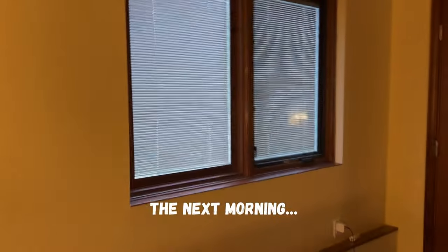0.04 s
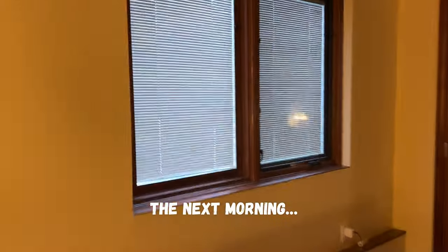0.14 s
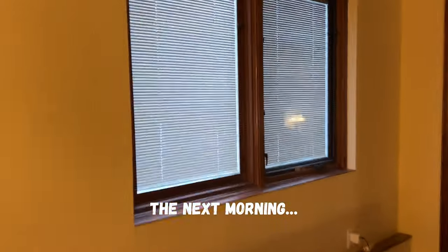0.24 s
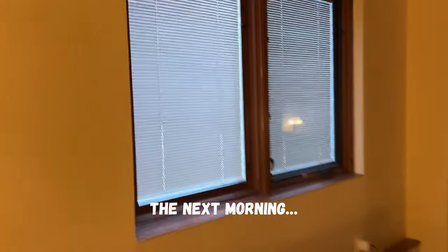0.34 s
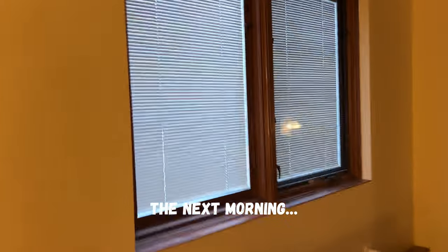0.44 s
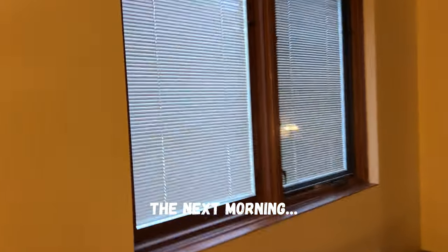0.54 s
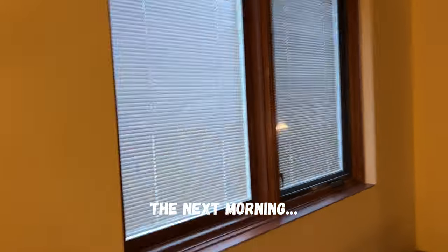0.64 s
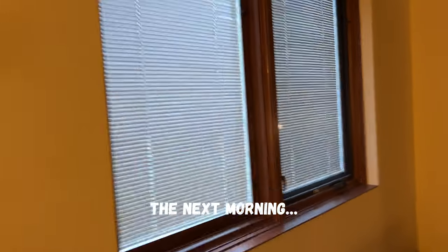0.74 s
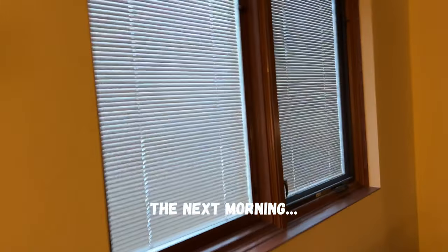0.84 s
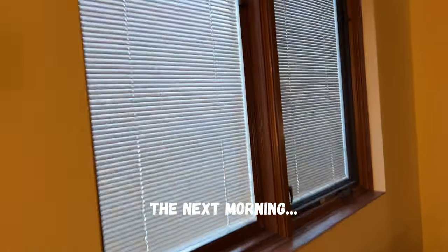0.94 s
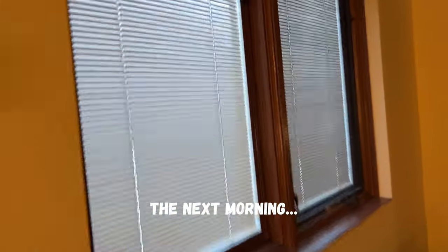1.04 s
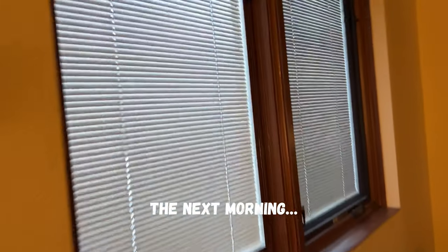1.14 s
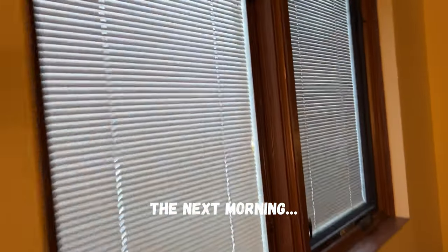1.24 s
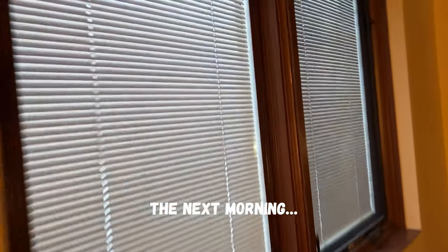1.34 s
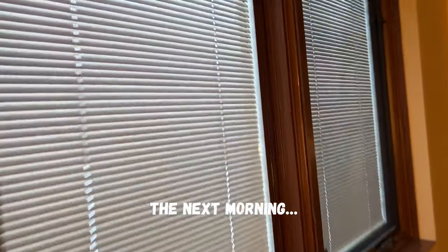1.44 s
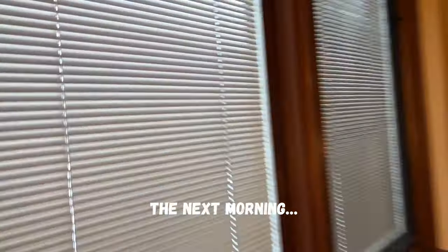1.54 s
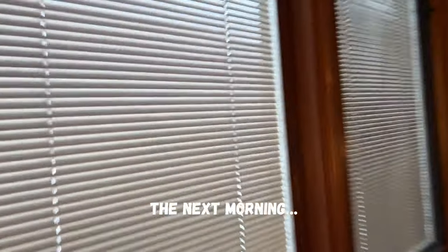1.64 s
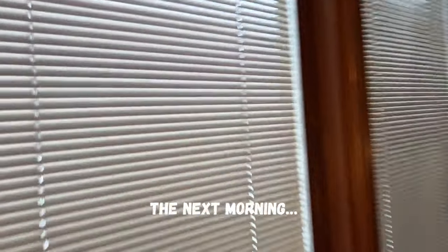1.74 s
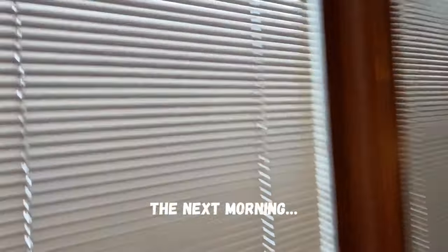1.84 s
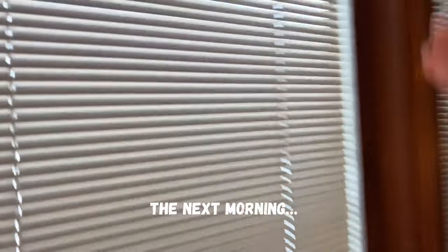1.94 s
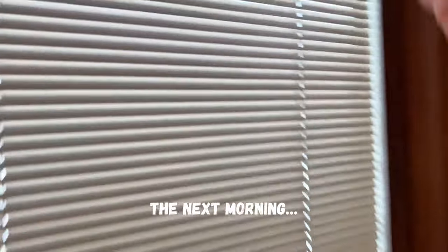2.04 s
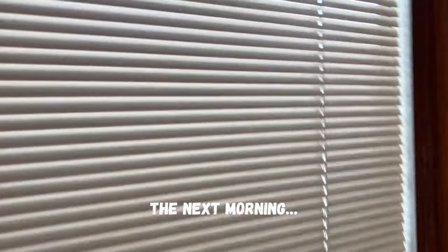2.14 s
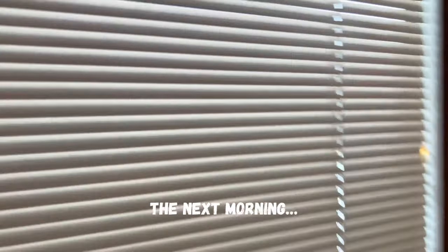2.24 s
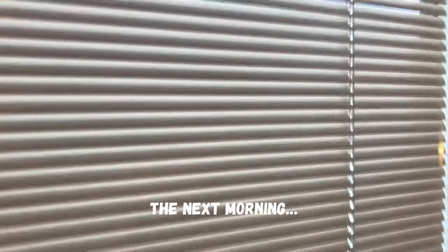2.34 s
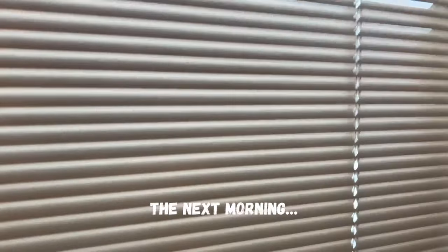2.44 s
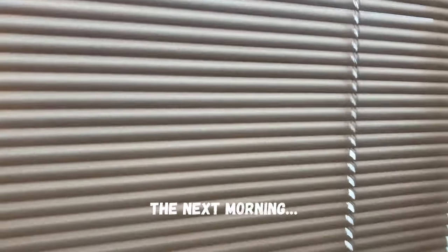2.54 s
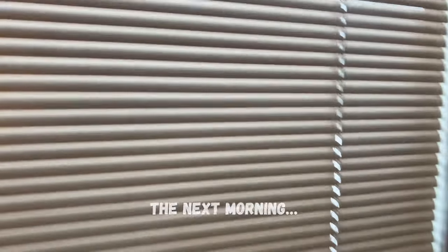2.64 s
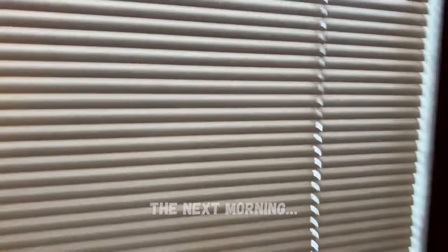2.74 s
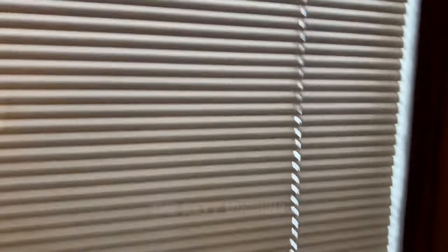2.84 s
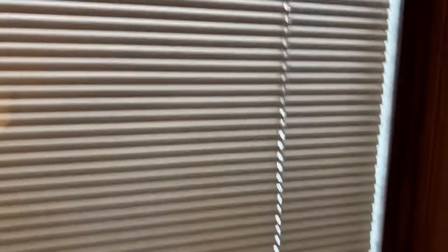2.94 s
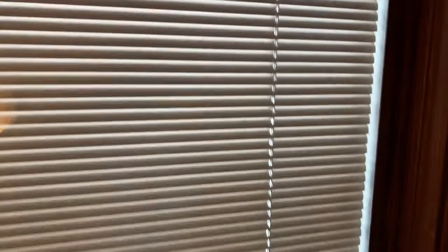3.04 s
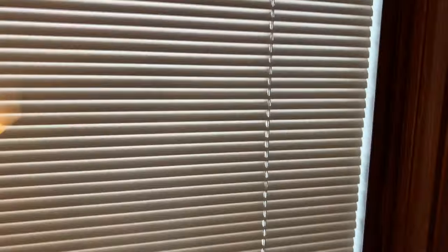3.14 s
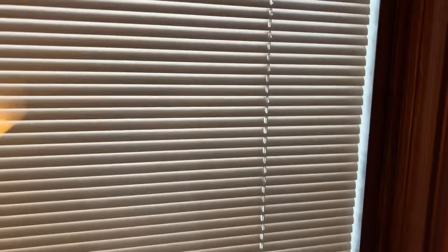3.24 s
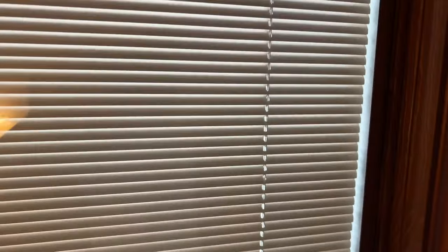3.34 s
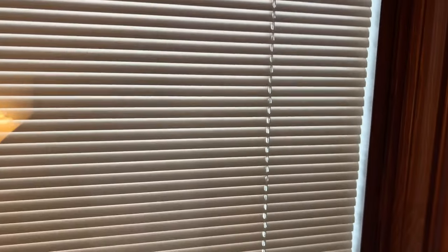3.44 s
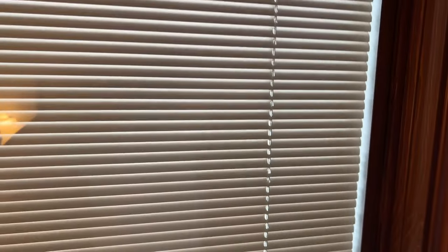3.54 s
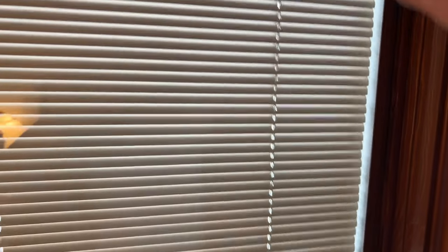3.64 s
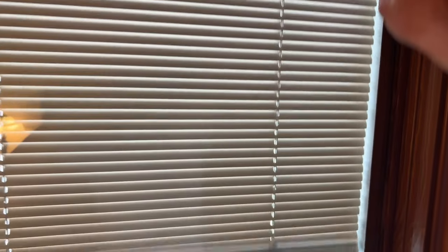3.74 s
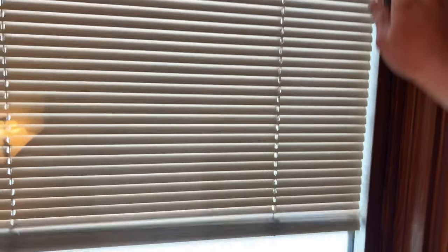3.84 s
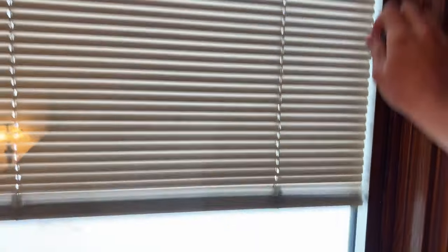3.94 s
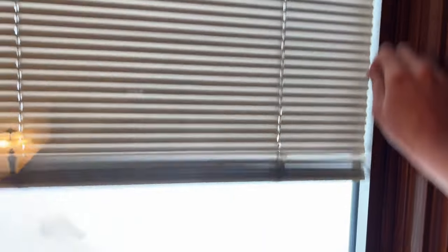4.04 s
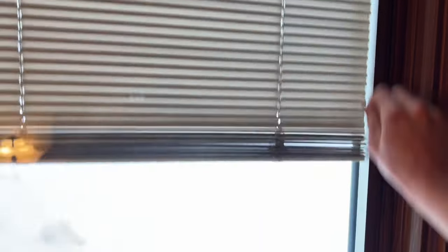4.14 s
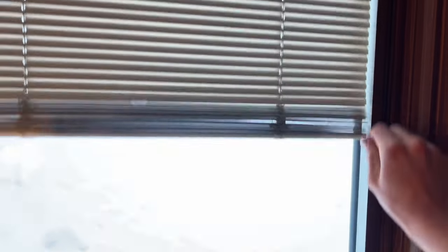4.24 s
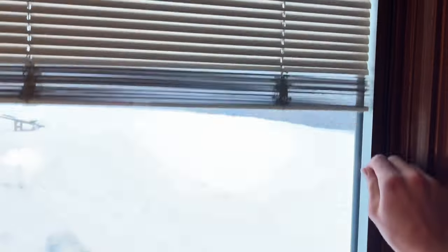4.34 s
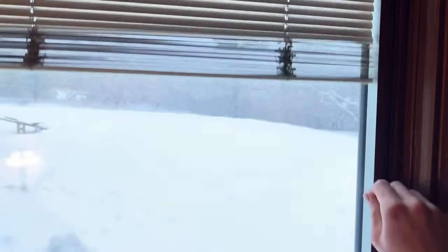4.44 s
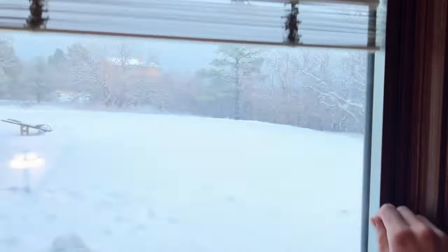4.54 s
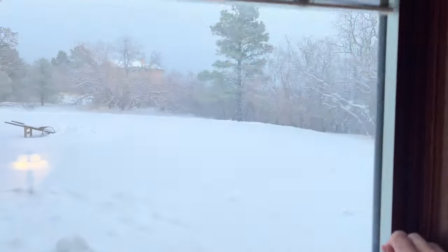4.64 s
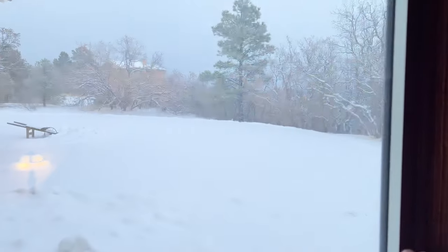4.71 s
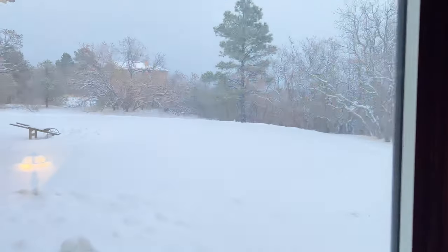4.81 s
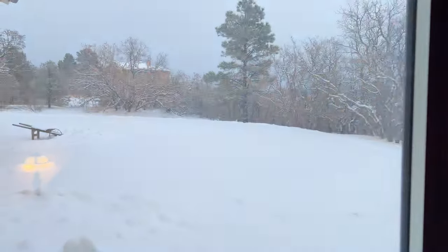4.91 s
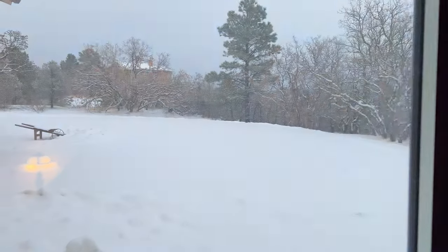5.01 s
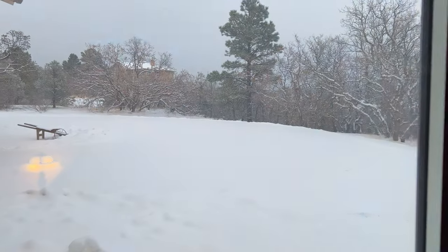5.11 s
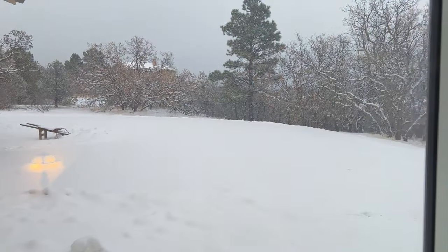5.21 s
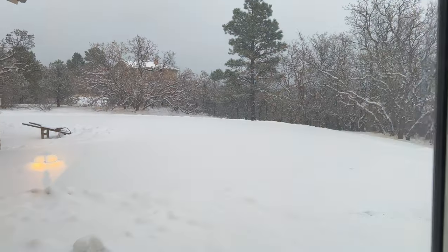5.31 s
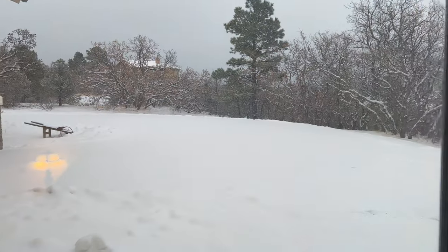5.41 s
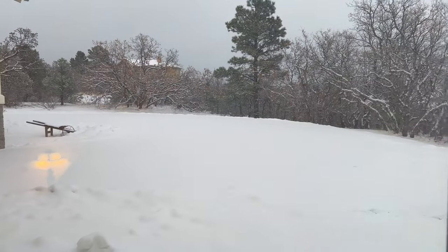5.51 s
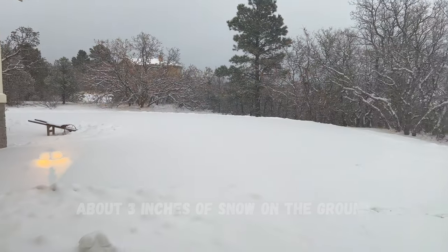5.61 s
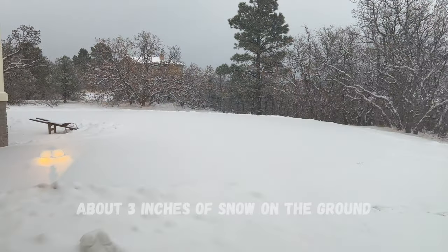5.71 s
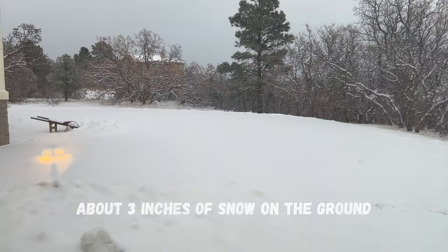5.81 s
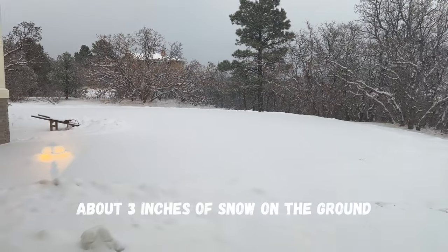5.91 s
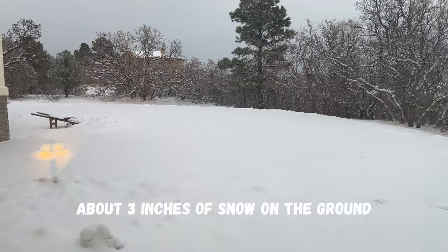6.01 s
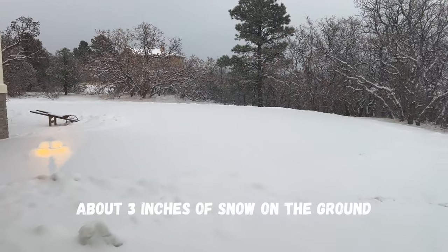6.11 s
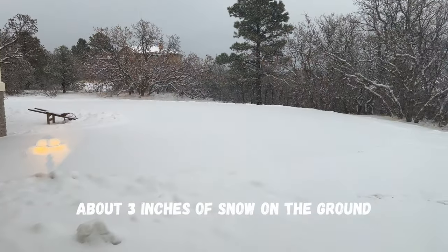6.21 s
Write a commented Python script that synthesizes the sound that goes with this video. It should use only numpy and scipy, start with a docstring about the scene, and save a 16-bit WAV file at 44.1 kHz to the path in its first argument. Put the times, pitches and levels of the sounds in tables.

```python
"""Blind sliding up inside window glazing

Handling rumble, a faint rustle with swishes and a few knocks come first; then a blind is slid up.
Its carriage shakes the panes (filtered noise and an uneven beat), its cord hisses and whistles (filtered
grains and noise), and thin slats chatter and clack as they stack (decaying modes struck repeatedly).
Clacks and knocks also excite a short room tail; a late tock stays dry. Two microphone ports hear the sum."""
import sys
import numpy as np
from scipy import signal
from scipy.fft import rfft, irfft, next_fast_len
from scipy.io import wavfile
from scipy.ndimage import uniform_filter1d

SR = 44100
rng = np.random.default_rng(int(sys.argv[2]) if len(sys.argv) > 2 else 0)


def to_wav(s):
    """Save 16-bit WAV."""
    ch = np.atleast_2d(s).T  # columns
    pcm = np.round(np.clip(ch, -1, 1) * 32767)  # PCM
    wavfile.write(sys.argv[1], SR, pcm.astype(np.int16))


N = 276418

# Modes of one slat. Each row: frequency in Hz, level in dB.
SLAT_MODES = [(620, -3.5), (980, -1), (1220, -3.5), (1440, 2.5), (1580, 0.5), (1780, 1.5), (2100, -2),
              (2450, -6.5), (2900, -14.5), (3500, -14.5)]


def gain_of(db):
    """Amplitude factor of a level in dB."""
    return 10 ** (np.asarray(db) / 20)


def evened(x):
    """Scales to an rms of 1."""
    return x / np.sqrt(np.mean(x ** 2) + 1e-20)


def noise():
    """Two unrelated streams of white noise."""
    return rng.standard_normal((2, N))


def read(points, hz):
    """Interpolates a curve over log frequency."""
    f, value = np.transpose(points)
    return np.interp(np.log(hz + 1), np.log(f + 1), value)


def colour(x, points):
    """Causal minimum-phase filter with the given spectrum in dB."""
    level_db = np.maximum(read(points, np.fft.rfftfreq(8192, 1 / SR)), -100)
    log_gain = np.log(gain_of(level_db))
    circle = np.r_[log_gain, log_gain[-2:0:-1]]
    taps = np.fft.ifft(np.exp(np.conj(signal.hilbert(circle)))).real[:4096]
    return signal.oaconvolve(x, taps[None], axes=1)[:, :N]


def resonate(x, hz, width_hz):
    """Shifts hz down to zero, smooths, and shifts back: a resonance of gain 1."""
    turn = np.exp(2j * np.pi * np.cumsum(hz * np.ones(x.shape[-1])) / SR)
    r = np.exp(-np.pi * width_hz / SR)
    return 2 * (turn * signal.lfilter([1 - r], [1, -r], x / turn + 1e-18)).real


def resonate_twice(x, hz, first_width_hz, second_width_hz):
    """Two resonances in series at one frequency, for steeper skirts."""
    return resonate(resonate(x, hz, first_width_hz), hz, second_width_hz)


def resonance_bank(x, modes):
    """Parallel resonances of alternating sign, evened; rows of Hz, width in Hz, dB."""
    total = 0
    for k, (hz, width_hz, db) in enumerate(modes):
        gain = (-1) ** k * gain_of(db) / np.sqrt(width_hz)
        total = total + gain * resonate_twice(x, hz, 3 * width_hz, width_hz)
    return evened(total)


def columns(table):
    """Each column sample by sample, and a mask that fades in and out around the table."""
    t, rows = np.arange(N) / SR, np.array(table)
    on = (t >= rows[0, 0]) & (t <= rows[-1, 0] + .1)
    return uniform_filter1d(on * 1., 2000), [np.interp(t, rows[:, 0], c) for c in rows.T[1:]]


def grains(per_s, spread_db):
    """Two unrelated streams of tiny clicks, a few of them large."""
    size = gain_of(spread_db * np.minimum(rng.exponential(1, (2, N)), 5))
    return size * np.sign(noise()) * (rng.random((2, N)) < per_s / SR)


def wander(width):
    """Slow random curve of rms 1, smoothed twice over width samples."""
    return evened(uniform_filter1d(uniform_filter1d(rng.standard_normal(N), width), width))


def flutter(width, depth_db):
    """Random gain that wavers over about width samples, by depth_db rms."""
    return gain_of(depth_db * wander(width))


def swell(middle_s, spread_s):
    """A bell of height 1 in time."""
    return np.exp(-.5 * ((np.arange(N) / SR - middle_s) / spread_s) ** 2)


def room(x):
    """Sparse taps of random sign, each band dying at its own speed; two unrelated tails."""
    # Decay of the room. Each row: frequency in Hz, t60 in s.
    room_t60 = [(150, 0.69), (600, 0.22), (2000, 0.37), (6000, 0.24), (14000, 0.21)]
    taps = np.zeros((2, SR // 2))
    at = np.arange(200, SR // 2 - 20, 20)
    places = at + rng.integers(0, 20, (2, len(at)))
    taps[[[0], [1]], places] = rng.choice([-1., 1.], (2, len(at)))
    hz, t, z = signal.stft(taps, SR, nperseg=256)
    fall = gain_of(-60 * t / read(room_t60, hz)[:, None])
    tail = signal.istft(z * fall, SR, nperseg=256)[1]
    return signal.fftconvolve(x[None], tail / np.linalg.norm(tail[0]), axes=1)[:, :N]


def handling():
    """Low handling rumble: filtered noise with a wavering, drawn level."""
    # Handling. Each row: time in s, level in dB.
    handling_levels = [(0.0, -56), (0.3, -65.5), (0.4, -48.5), (0.57, -49), (0.75, -61), (1.01, -53),
                       (1.5, -55), (1.6, -47), (1.8, -44), (2.3, -46.5), (2.4, -41), (2.8, -45.5),
                       (3.0, -41), (3.5, -45.5), (3.85, -54.5), (4.5, -53.5), (5.03, -40), (5.5, -40.5),
                       (5.75, -53.5), (6.27, -46)]
    # Rumble spectrum. Each row: frequency in Hz, relative density in dB per Hz.
    heave_spectrum = [(12, -38), (20, -10), (56, 8), (73, -4), (92, 1), (135, -12), (403, -27),
                      (500, -23.5), (650, -52.5), (1100, -120)]
    _, (heave_db,) = columns(handling_levels)
    return gain_of(heave_db) * evened(colour(noise(), heave_spectrum) * flutter(2500, 2.2))


def rustle():
    """Grainy rubbing whose resonances swell and shift in swishes as the hand moves."""
    # Rustle. Each row: time in s, then relative dB of the main resonance, low mids and treble.
    rustle_levels = [(0.0, -96, -68, -85), (0.18, -89, -89, -100), (0.3, -71, -55, -74.5),
                     (0.65, -78.5, -60, -74), (0.88, -82, -67, -85.5), (0.97, -67, -56, -72),
                     (1.35, -75, -60.5, -78), (1.7, -65, -55, -70.5), (1.88, -64, -47, -62.5),
                     (2.3, -58.5, -51.5, -67.5), (2.47, -62, -65, -75), (2.66, -61, -48, -73),
                     (2.9, -63, -32.5, -80), (5.3, -67, -53, -86), (5.62, -69, -52.5, -91.5),
                     (5.8, -86, -78.5, -77), (6.0, -73, -58.5, -76.5), (6.11, -48.5, -16.5, -56),
                     (6.22, -65, -45.5, -117)]
    # Swishes. Each row: middle in s, spread in s, relative level in dB, main resonance in Hz.
    swish_rows = [(0.05, 0.076, -75, 1840), (0.47, 0.044, -73, 1900), (0.62, 0.04, -73, 1800),
                  (0.81, 0.049, -68.5, 1720), (1.056, 0.016, -62, 1730), (1.19, 0.052, -68, 1670),
                  (1.4, 0.015, -67, 1593), (1.49, 0.023, -63, 1646), (1.69, 0.024, -69.5, 1800),
                  (1.985, 0.034, -55.5, 1960), (2.06, 0.035, -56, 1960), (2.25, 0.015, -59, 1920),
                  (2.55, 0.021, -66, 1970), (2.63, 0.062, -54.5, 1920), (2.858, 0.03, -50.5, 1680),
                  (5.5, 0.031, -60, 1904), (5.6, 0.037, -61.5, 1750), (5.68, 0.04, -60.5, 1600),
                  (5.755, 0.01, -69.5, 1620)]
    # Rustle spectrum. Each row: frequency in Hz, relative density in dB per Hz.
    rustle_spectrum = [(120, -47), (250, -11.5), (700, -10.5), (1400, -3.5), (2400, -7.5), (2900, -14),
                       (3700, -11.5), (5200, -21.5), (7000, -25), (10000, -18.5), (13000, -26.5),
                       (15000, -21.5), (16400, -39)]
    # Upper resonances. Each row: frequency in Hz, width in Hz, relative level in dB.
    upper_modes = [(3690, 380, -7), (5200, 400, -29.5), (6660, 350, -18)]
    calm_hz = 1750
    _, (calm_db, low_db, treble_db) = columns(rustle_levels)
    swells = [gain_of(db) * swell(s, spread_s) for s, spread_s, db, _ in swish_rows]
    level = gain_of(calm_db) + sum(swells)
    weighted_hz = sum(g * row[3] for g, row in zip(swells, swish_rows))
    main_hz = (gain_of(calm_db) * calm_hz + weighted_hz) / level

    rub = evened(grains(600, 2.6)) + 1.9 * noise()
    wide = gain_of(-10.0) * evened(colour(rub, rustle_spectrum))
    low, below = (signal.sosfiltfilt(signal.butter(3, hz, fs=SR, output="sos"), wide)
                  for hz in (1300, 2800))
    main = evened(resonate_twice(rub, main_hz, 540, 480) * flutter(1500, 1.2))
    # upper resonances come out in the stronger, higher swishes
    swish = noise() * (level / gain_of(-44.0)) ** 0.76 * (main_hz / 1900) ** 4
    upper = sum(gain_of(db) / np.sqrt(width_hz / SR) * resonate_twice(swish, hz, width_hz, width_hz)
                for hz, width_hz, db in upper_modes)
    return (gain_of(-1.0) * level * (below - low + main + upper)
            + gain_of(low_db + 2.0) * low + gain_of(treble_db + 20.0) * (wide - below))


def knocks():
    """A snap of a few cycles, a noisy ring around it, a thud that swells more slowly, a treble rattle."""
    # Nearby knocks. Each row: start in s, snap level in dB, pitch in Hz, relative dB of the noisy ring
    # and thud, thud pitch in Hz, relative dB of the treble, t60 in s.
    knock_rows = [(0.067, -57.5, 580, 2.5, -28, 110, 22.5, 0.08),
                  (0.11, -42.5, 370, -4, -31, 250, 26.5, 0.029),
                  (0.112, -46, 674, -16, -30, 110, -20, 0.04), (0.158, -58, 640, -9, -22, 110, -12, 0.043),
                  (0.278, -68.5, 1100, 7, -14, 127, -27, 0.13), (0.39, -62.5, 610, 1, 12.5, 138, -20, 0.17),
                  (0.955, -63, 1700, -2, -17, 110, -6, 0.057), (1.044, -60, 750, 5, -25, 110, -22, 0.14),
                  (1.201, -61, 1710, 6, -6, 154, -5, 0.036), (1.337, -63, 310, 10, -7, 132, -25, 0.085),
                  (1.723, -41, 3650, -25, -8.5, 110, 16, 0.035),
                  (1.781, -22.5, 1500, -18.5, -15, 150, 11, 0.18),
                  (1.782, -26, 4750, -6, -30, 110, -20, 0.019),
                  (1.787, -34.5, 295, -2, -0.5, 117, -20, 0.07),
                  (1.837, -39.5, 1600, -2, -30, 110, -10, 0.034), (2.039, -48, 1030, -4, -1, 111, -16, 0.1),
                  (2.353, -56, 226, 3, 3, 151, -20, 0.04), (2.364, -37.5, 910, 9, 0.5, 135, 22, 0.069),
                  (2.379, -35, 520, 4, -3, 118, -17, 0.091), (2.397, -41, 850, 0, -20, 110, -20, 0.04),
                  (2.416, -46, 1170, -1, -20, 110, -20, 0.077), (2.7, -33, 690, 3, -10, 127, -29, 0.075),
                  (2.702, -30, 1330, -8, -28, 110, -22, 0.03), (2.716, -39, 463, 5, -27, 110, -35, 0.096),
                  (6.018, -45.5, 1070, -6, -4, 112.8, -20, 0.054),
                  (6.098, -32, 403.3, -3.5, 0, 236, -22, 0.15),
                  (6.112, -40, 342.6, -18, 7.5, 167, -33, 0.1)]
    room_send_db = -4
    out, t = np.zeros((2, N + SR)), np.arange(12000) / SR
    for s, db, hz, ring_db, thud_db, thud_hz, treble_db, t60 in knock_rows:
        a, b, c = rng.standard_normal((3, len(t)))
        u = t * hz / 0.97
        snap = np.e * u * np.exp(-u) * np.sin(2 * np.pi * hz * t)
        fall = gain_of(-60 * t / max(t60, .005)) * (1 - np.exp(-t / 0.0013))
        sinking_hz = hz * (.85 + .3 * np.exp(-t / .03))  # the upper modes die first
        ring = evened(resonate_twice(a, sinking_hz, 0.6 * hz, 1.0 * hz)) * gain_of(ring_db) * fall
        thud = np.sin(2 * np.pi * thud_hz * t) + evened(resonate_twice(b, thud_hz, 180, 180))
        thud *= gain_of(thud_db + 8.5 - 60 * t / 0.088) * (1 - np.exp(-t / 0.0075))
        treble = evened(resonate(resonate(c, 1800, 8200), 2800, 17000))
        treble = treble * gain_of(treble_db - 26.0) * fall
        # second row feeds the room: short taps close by stay drier
        far_db = db + room_send_db + 10 * np.log10(t60 / 0.081)
        mix = [[1], [.35]] * snap + ring + [[1], [.45]] * thud + treble
        out[:, round(s * SR):][:, :len(t)] += gain_of([[db], [far_db]]) * mix
    return out[:, :N]


def tock():
    """A late small tock: a few short clear modes."""
    # Tock modes. Each row: frequency in Hz, relative level in dB, t60 in s.
    tock_modes = [(1600, 2, 0.038), (2030, 3.5, 0.027), (2237, -9.5, .02), (2623, -18, .015),
                  (3670, -13, 0.016)]
    start_s, level_db = 5.726, -41.5
    t = np.maximum(np.arange(N) / SR - start_s, 0)
    modes = sum(gain_of(level_db + db - 60 * t / t60) * np.sin(2 * np.pi * hz * t)
                for hz, db, t60 in tock_modes)
    return (1 - np.exp(-t / 0.00061)) * modes


def clacks():
    """Slat modes with a bright tick, a dry crack and a high ping; modes and tick repeat as it settles."""
    # Slats clacking on the stack. Each row: start in s, level in dB, strongest region in Hz,
    # relative dB of the treble tick and of the high ping.
    clack_rows = [(2.86, -40, 1650, -31, -39), (2.958, -39, 1080, -18, -23), (3.071, -31, 1570, -8, -20),
                  (3.158, -24, 2000, -18, -14), (3.285, -12, 1470, -19.5, -27),
                  (3.319, -13, 1500, -16.5, -32), (3.339, -17.5, 1290, -33, -34),
                  (3.451, -11.5, 1220, -15.5, -10), (3.474, -18, 1200, -29, -17), (3.69, -7, 1200, -15, -5),
                  (3.726, -14, 1060, -35, 1.5), (3.83, -33.5, 1500, -30, 20.5),
                  (3.842, -12.5, 1190, -30, -2), (3.915, -19.5, 1400, -25, -12),
                  (3.944, -4.5, 1180, -18, -7), (3.974, -13.5, 1490, -32.5, -26),
                  (4.077, -16.5, 1560, -18, 6), (4.161, -13, 1320, -9.5, 6), (4.323, -27, 1300, -25, 15.5),
                  (4.398, -27.5, 1450, 3, 18), (4.413, -20, 1030, -25, -20), (4.432, -14.5, 1520, -31, 2),
                  (4.559, -21.5, 1250, -14.5, 10.5), (4.598, -22.5, 1850, -4, 15.5),
                  (4.613, -18, 1400, -26.5, -14), (4.645, -10.5, 1340, -21.5, -5),
                  (4.728, -16, 1360, -12, 0), (4.777, -22, 937, -26.5, 11), (4.832, -17.5, 1400, -26, -18),
                  (4.923, -20.5, 1500, -27.5, -2), (5.03, -21, 1390, -24.5, -18),
                  (5.099, -26.5, 1400, -26, -13), (5.212, -23.5, 1377, -28, 4.5),
                  (5.322, -26.5, 2000, -29.5, -25)]
    # A slat settling. Each row: shortest lag in s, random extra lag in s, share of the first blow.
    bounces = [(.0025, .001, 0.72), (.005, 0.00212, 0.44), (.008, 0.0062, 0.22), (0.014, .006, .2),
               (0.021, .008, 0.12)]
    # Tick spectrum. Each row: frequency in Hz, relative density in dB per Hz.
    tick_spectrum = [(1500, -28), (3000, -11.5), (4300, -19.5), (5200, -8.5), (6200, -13.5), (7500, -15.5),
                     (9000, -20), (11000, -9.5), (12500, -22.5), (14300, -12.5), (15500, -15.5),
                     (16400, -23.5)]
    t60_at_1200_hz, crack_db = 0.015, -21.5
    rings, ticks, t = np.zeros(N + SR), np.zeros(N + SR), np.arange(6000) / SR
    for s, db, centre_hz, tick_db, ping_db in clack_rows:
        # high modes die sooner; the place of the blow changes each mode's share
        ring = np.zeros(len(t))
        for hz, mode_db in SLAT_MODES:
            place, tuning = rng.random(2)
            share_db = mode_db + 4 * (place - .5) - 9 * np.log2(hz / centre_hz) ** 2
            mode_hz = hz * (1 + 0.042 * (tuning - .5))
            ring += (gain_of(share_db - 60 * t * hz / (1200 * t60_at_1200_hz))
                     * np.sin(2 * np.pi * (mode_hz * t + 0.62 * place)))
        ring *= 1 - np.exp(-t / 0.0012)
        hit = ring = ring / abs(ring).max()
        burst = single = gain_of(-60 * t / 0.013) * (1 - np.exp(-t / 0.0009))
        for lag_s, spread_s, share in bounces:
            late, strong = rng.random(2)
            pad = np.zeros(round(abs(lag_s + spread_s * late) * SR))
            size = share * (0.61 + 0.5 * strong)
            hit = hit + size * np.sign(late - .5) * np.r_[pad, ring][:len(t)]
            burst = burst + 0.77 * size ** 2 * np.r_[pad, single][:len(t)]
        hit = hit / abs(hit).max()
        ping_hz = 5250 + 400 * rng.random()
        hit += gain_of(ping_db - 15.5 - 60 * t / 0.022) * np.sin(2 * np.pi * ping_hz * t)
        crack = evened(resonate(resonate(rng.standard_normal(len(t)), 2200, 1300), 2700, 2400))
        hit += gain_of(crack_db - 60 * t / 0.033) * crack
        rings[round(s * SR):][:len(t)] += gain_of(db) * hit
        ticks[round(s * SR):][:len(t)] += gain_of(db + tick_db) * burst * rng.standard_normal(len(t))
    return rings[:N] + gain_of(24.0) * colour(ticks[None], tick_spectrum)[0]


def roller(bumps):
    """The roller's beat: a wobbling sine mixed with bumps resonating at the same moving pitch."""
    # Roller. Each row: time in s, beat in Hz, level in dB.
    roller_beat = [(2.9, 181.8, -53), (3.0, 168, -42), (3.28, 163.1, -33), (3.46, 169.9, -30.5),
                   (3.51, 171.8, -21), (3.57, 172, -24.5), (3.62, 230.1, -24.5), (3.7, 254.8, -21.5),
                   (3.78, 245.1, -24), (3.85, 197.1, -27.5), (3.97, 304.1, -19), (4.04, 314.6, -18),
                   (4.17, 245, -22.5), (4.32, 264.9, -21), (4.47, 250.1, -22), (4.61, 275.9, -20),
                   (4.84, 282, -20.5), (4.93, 264.8, -24.5), (5.0, 185.2, -30), (5.08, 175, -27),
                   (5.18, 172, -21), (5.27, 168, -29.5), (5.36, 150, -42), (5.48, 149.2, -41.5),
                   (5.62, 149.8, -52.5), (6.08, 170.6, -72), (6.12, 167.5, -34), (6.18, 162, -36),
                   (6.22, 161, -59)]
    steady_share = 0.48
    rolling, (beat_hz, beat_db) = columns(roller_beat)
    wobble = 0.0499 * wander(600)
    steady = evened(np.sin(2 * np.pi * np.cumsum(beat_hz * (1 + wobble)) / SR))
    uneven = evened(resonate_twice(bumps, beat_hz, 70, 32))
    beat = (steady_share * steady + (1 - steady_share) * uneven) * flutter(500, 1.6)
    return rolling * gain_of(beat_db) * evened(beat)


def pane_rumble(bumps):
    """Small bumps of the carriage ring the panes' resonances."""
    # Pane resonances. Each row: frequency in Hz, width in Hz, relative level in dB.
    pane_modes = [(104, 30, -11), (130.1, 8.4, -4), (168, 8.5, -0.5), (313, 120, -4), (366.7, 51.6, 1),
                  (461.4, 17.3, -9), (607.3, 39, -5), (720, 120, -8.5)]
    return evened(flutter(1500, 1.33) * resonance_bank(bumps, pane_modes))


def slat_chatter():
    """Filtered grains and noise: slats chattering."""
    # Chatter spectrum. Each row: frequency in Hz, relative density in dB per Hz.
    chatter_spectrum = [(180, -18.5), (300, -13.5), (413, -20.5), (602, -13.5), (801, -16), (1170, -13),
                        (1400, -10.5), (2070, -17), (2630, -31), (4600, -51.5), (5980, -50), (10100, -120)]
    raw = evened(grains(300, 1.8)) + 2.4 * noise()
    return evened(colour(raw, chatter_spectrum) * flutter(300, 0.14) * flutter(1500, 1.59))


def rattle():
    """Countless small knocks of slat on slat, each ringing one slat mode slightly out of tune."""
    t60_at_1200_hz = 0.03
    size, t = grains(per_s=800, spread_db=2.4), np.arange(3000) / SR
    mode = rng.integers(0, 2 * len(SLAT_MODES), N)
    total = np.zeros((2, N))
    for k, (hz, db) in enumerate(SLAT_MODES + SLAT_MODES):
        fall = gain_of(db - 60 * t * hz / (1200 * t60_at_1200_hz))
        ring = fall * np.sin(2 * np.pi * hz * rng.uniform(0.941, 1.04) * t)
        total += signal.oaconvolve(size * (mode == k), ring[None], axes=1)[:, :N]
    return evened(total)


def cord_hiss():
    """Filtered grains and noise: the running cord."""
    # Hiss spectrum. Each row: frequency in Hz, relative density in dB per Hz.
    hiss_spectrum = [(2500, -7), (3000, -2.5), (3600, -2), (4400, -0.5), (5300, 3.5), (6300, 0), (8000, -4),
                     (9000, 3.5), (10200, -6.5), (12500, -2), (13800, -8), (14700, 0.5), (15200, -17.5),
                     (16400, -7.5)]
    raw = evened(grains(1500, 2.0)) + 1.7 * noise()
    return evened(colour(raw, hiss_spectrum) * flutter(400, 0.61) * flutter(1500, 0.53))


def cord_whistle(grit):
    """Grit excites two moving resonances of the cord in its guide; short swells make squeaks."""
    # Whistle. Each row: time in s, level in dB, centre in Hz.
    whistle_track = [(2.85, -100, 5230), (2.97, -52, 5700), (3.09, -45, 5600), (3.16, -54.5, 5000),
                     (3.3, -57, 5400), (3.5, -45.5, 5060), (4.2, -43, 5170), (4.8, -42, 5190),
                     (5.23, -51, 5200), (5.37, -61, 5280), (5.45, -53.5, 5340), (5.55, -62, 5330),
                     (5.61, -64.5, 5200), (5.66, -94.5, 5220), (6.04, -86, 5100), (6.1, -54.5, 4970),
                     (6.2, -91, 5190)]
    # Brief squeaks of the cord. Each row: middle in s, level in dB.
    squeaks = [(3.602, -36), (4.4, -36), (4.599, -33)]
    _, (whistle_db, whistle_hz) = columns(whistle_track)
    pair = sum(g * resonate_twice(grit, whistle_hz + offset_hz, 550, 270)
               for g, offset_hz in ((.9, -310), (-.9, 299)))
    level = gain_of(whistle_db) + sum(gain_of(db) * swell(s, spread_s=0.0027) for s, db in squeaks)
    return level * evened(pair)


def low_whistle(grit):
    """Grit through one broad fixed resonance."""
    return evened(resonate_twice(grit, 3560, 840, 840))


def track_rub(grit):
    """Grit through the resonances of the carriage rubbing its track."""
    # Rubbing. Each row: frequency in Hz, width in Hz, relative level in dB.
    rub_modes = [(605, 31, -18.5), (998, 57, -15), (1100, 40, 1.5), (1390, 34, 4.5), (1760, 31, -15.5)]
    return resonance_bank(grit, rub_modes)


def slider():
    """Roller, panes, slats, track and cord, most of them following the strength of the slide."""
    # Travel. Each row: time in s, strength in dB, then dB relative to it of the pane rumble,
    # lower whistle and rubbing.
    slide_travel = [(2.8, -68, 9, -11, -15), (2.97, -41, -6.5, -16, -6), (3.14, -36.5, 1.5, -17, -21),
                    (3.3, -41, 6, -13, 1), (3.46, -32, 2.5, -14, -3), (3.6, -31, 5, -12, -26),
                    (3.9, -31.5, 8.5, -10.5, -7), (4.15, -29, 6.5, -12.5, -17), (4.6, -30.5, 6, -14.5, -6),
                    (4.91, -31, 6.5, -12.5, -11), (5.23, -37.5, 3, -16, -1.5), (5.38, -49.5, 8.5, -26, -2),
                    (5.45, -43, 7, -33, 1), (5.55, -52.5, 10.5, -37, 5), (5.62, -68, 12, -28, 8),
                    (5.68, -70, 5.5, -25.5, 0.5), (5.8, -72, 1, -20.5, -10.5), (6.05, -64.5, 3, -20, -9),
                    (6.1, -52.5, 18.5, -8, -8), (6.17, -65, 14, -7, 1), (6.22, -64, -6, -25, 7)]
    on, (pull_db, rumble_db, low_db, rub_db) = columns(slide_travel)
    bumps = noise()
    grit = (evened(grains(360, 2.1)) + 2.0 * noise()) * flutter(150, 1.0) * flutter(1500, 1.62)
    hiss_db = -9.5 - 30 + 0.96 * (pull_db + 30)  # 0.96 dB per dB of strength
    moving = gain_of(pull_db + rumble_db) * pane_rumble(bumps)
    moving += gain_of(pull_db + 1.34) * slat_chatter()
    moving += gain_of(pull_db - 4.5) * rattle()
    moving += gain_of(pull_db + low_db) * low_whistle(grit)
    moving += gain_of(pull_db + rub_db) * track_rub(grit)
    moving += gain_of(hiss_db) * cord_hiss()
    moving += cord_whistle(grit)
    return roller(bumps) + on * moving


def ports(x):
    """Left hears the first stream; right a phase-turned, shaded share of it, the rest from the second."""
    # Each row: frequency in Hz, left-right likeness (0 to 1).
    likeness = [(60, 0.94), (300, 0.94), (450, 0.76), (700, 0.25), (1300, 0.38), (3000, 0.16), (5000, 0.12),
                (6300, 0.19), (7000, 1), (16000, 0.94)]
    # Each row: frequency in Hz, left over right in dB.
    left_over_right = [(60, 1.5), (200, 3.5), (700, 4), (1700, 7.5), (2800, 4.5), (4300, 9.5), (5300, 15),
                       (6400, 4), (7300, 1.5), (16000, -0.5)]
    # Each row: frequency in Hz, phase of left relative to right in radians.
    left_phase = [(0, 0), (400, .25), (650, 1.2), (1200, -1.3), (1900, -2.8), (7200, -2 * np.pi),
                  (9500, -2.92 * np.pi), (10700, -3.06 * np.pi), (12600, -3.97 * np.pi),
                  (14000, -4.04 * np.pi), (16450, -5 * np.pi)]
    size = next_fast_len(N + 4096)
    hz, (a, b) = np.fft.rfftfreq(size, 1 / SR), rfft(x, size)
    same = np.clip(read(likeness, hz), 0, 1)
    phase = np.interp(hz, *np.transpose(left_phase))
    right = same * np.exp(-1j * phase) * a + np.sqrt(1 - same ** 2) * b
    half = gain_of(read(left_over_right, hz) / 2)
    return irfft([a * half, right / half], size)[:, :N]


def scene():
    """Background, hits, a room tail of clacks and knocks, and the slider, heard at the two ports."""
    clack, (knock, knock_far) = clacks(), knocks()
    hits = clack + knock + tock() + room(gain_of(-5.0) * clack + knock_far)
    return ports(handling() + rustle() + hits + slider())


def record(dry):
    """The microphones lose the deepest bass; then a band limit, with a hard ceiling on either side."""
    edge_hz = 16450
    dry = signal.sosfilt(signal.butter(2, 36, "high", fs=SR, output="sos"), dry)
    taps = signal.firwin(511, edge_hz, window=("kaiser", 9), fs=SR)
    limited = signal.oaconvolve(np.clip(dry, -1, 1), taps[None], "same")
    return np.clip(limited, -1, 1)


dry = scene()
out = record(dry)
to_wav(out)
```